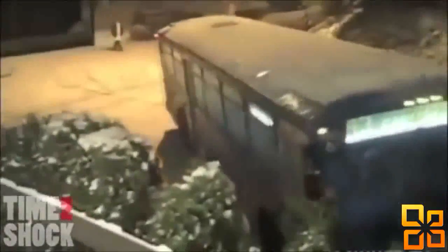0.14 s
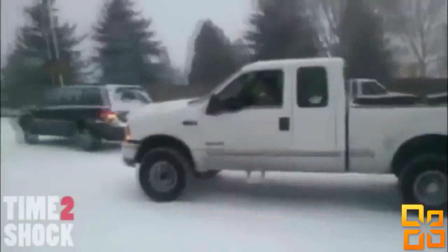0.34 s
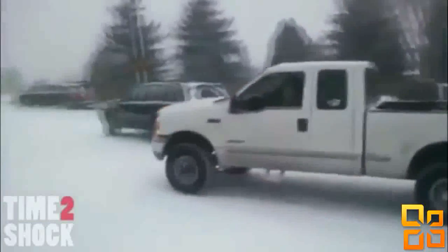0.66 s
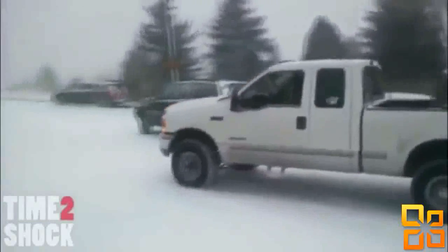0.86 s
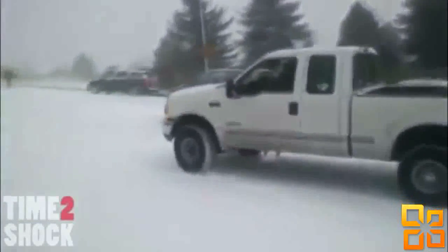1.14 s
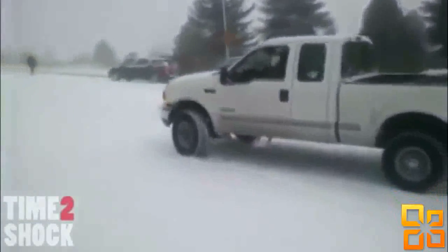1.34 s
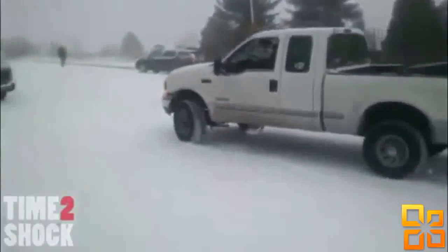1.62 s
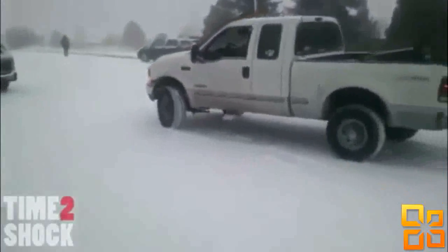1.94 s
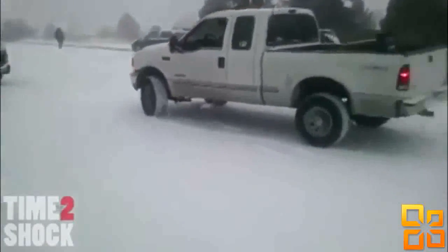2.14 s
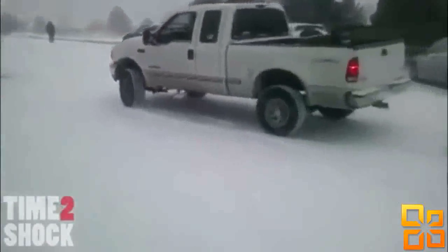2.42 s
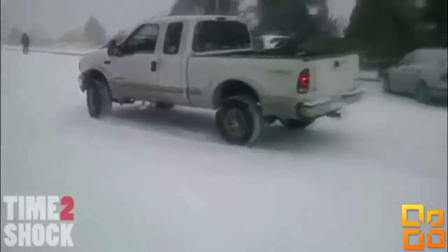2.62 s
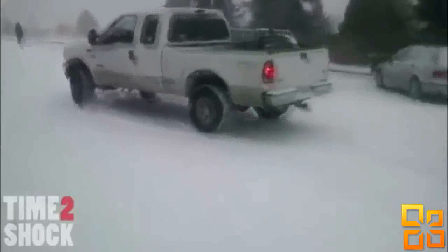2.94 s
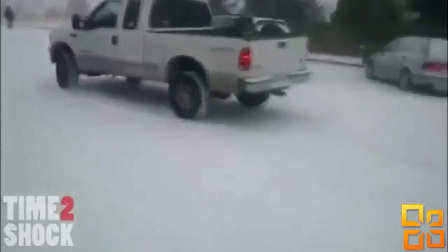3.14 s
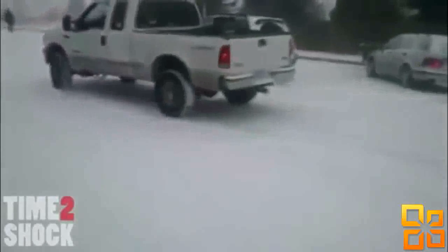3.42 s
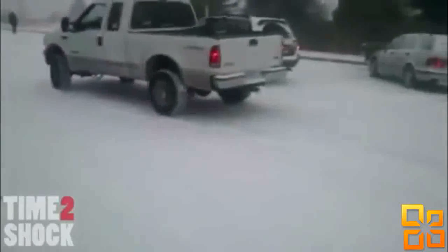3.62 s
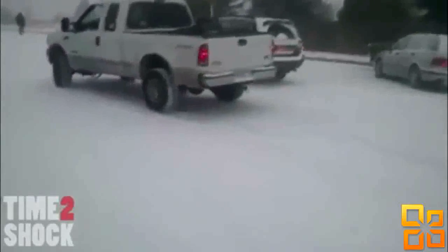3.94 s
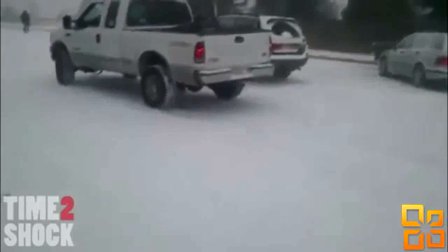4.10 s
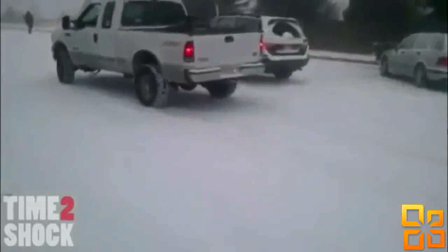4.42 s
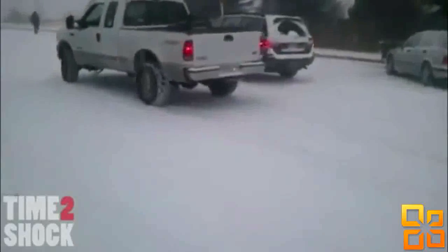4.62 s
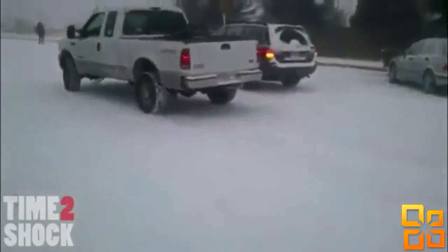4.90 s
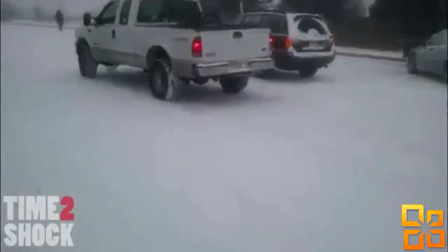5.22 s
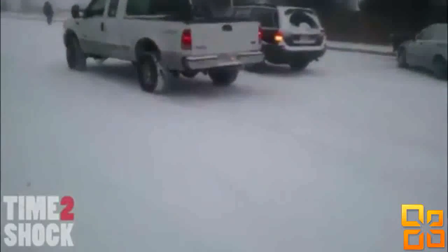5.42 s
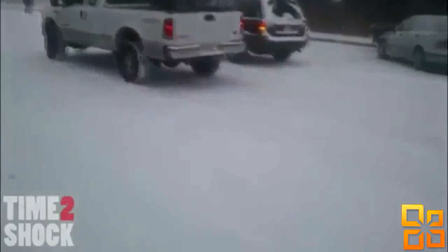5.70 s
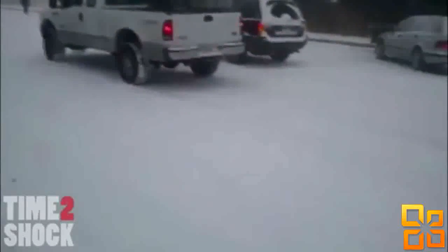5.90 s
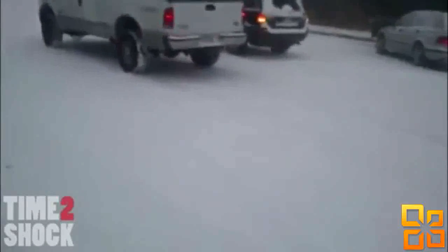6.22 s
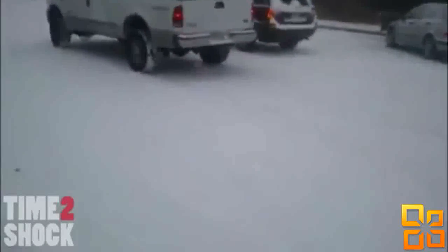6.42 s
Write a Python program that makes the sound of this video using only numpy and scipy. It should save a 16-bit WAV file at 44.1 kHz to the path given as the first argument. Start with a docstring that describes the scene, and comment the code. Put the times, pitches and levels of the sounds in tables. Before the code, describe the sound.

After brief silence, a rattling diesel truck breaks in abruptly, surging and easing as its wheels spin on snow amid gusty wind and traffic noise.

```python
"""After half a second of silence, clatter, hum and hissing tyres break in abruptly, in wind and street noise.
A diesel pickup creeps past on icy snow and pulls away, revving in bursts as its wheels slip.
Its V8 is noise pulsed at the firing rate through resonances, with an exhaust hum of sines.
Tyres are grainy filtered noise with cracks; thin noise bands glide; wind is random kicks, slaps and pops.
Street traffic is filtered noise with a wavering drone."""
import sys
import numpy as np
from scipy import signal
from scipy.fft import rfft, irfft, next_fast_len
from scipy.io import wavfile
from scipy.ndimage import uniform_filter1d, map_coordinates

SR = 44100
rng = np.random.default_rng(int(sys.argv[2]) if len(sys.argv) > 2 else 0)


def wrap_up_sound(samples):
    """Save the sound to the file named by the first command line argument, as 16-bit audio."""
    columns = np.atleast_2d(samples).T
    # keep every value between -1 and 1, then stretch to whole-number steps
    tamed = np.clip(columns, -1, 1)
    steps = np.round(tamed * 32767).astype(np.int16)
    wavfile.write(sys.argv[1], SR, steps)


N = 288855
T = np.arange(N) / SR  # time [s]


def amp(db):
    """Level: decibels to amplitude gain."""
    return 10 ** (np.asarray(db) / 20)


def unit(x):
    """Normalisation: scale to rms 1."""
    return x / np.sqrt(np.mean(x ** 2) + 1e-20)


def curves(rows):
    """Linear interpolation: one value per sample for each column after the time."""
    times, *columns = np.transpose(rows)
    return [np.interp(T, times, column) for column in columns]


def wobble(rate):
    """Band-limited random fluctuation: a smooth curve through rate random knots a second."""
    knots = rng.standard_normal(int(N * rate / SR) + 4)
    return map_coordinates(knots, [T * rate])


def filtered(x, response):
    """Linear filtering: the spectrum of x times a complex response of frequency."""
    size = next_fast_len(N + 8192)
    spectrum = rfft(x, size) * response(np.fft.rfftfreq(size, 1 / SR))
    return irfft(spectrum, size)[:N]


def coloured(x, points):
    """Spectral shaping: x through (frequency [Hz], level [dB]) points on a log axis."""
    f, db = np.transpose(points)
    return filtered(x, lambda hz: amp(np.interp(np.log(hz + 1), np.log(f + 1), db)))


def ringing(x, modes, order=1):
    """Modal resonance: parallel resonators excited by x; a higher order gives steeper skirts."""
    def response(f):
        total = 0
        for centre, width, db in modes:
            damping = 1j * f * width
            total = total + amp(db) * (damping / (centre * centre - f * f + damping)) ** order
        return total
    return filtered(x, response)


def drifting(x, shift_hz):
    """Single-sideband modulation: all frequencies of x move by the same changing amount."""
    analytic = signal.hilbert(x, next_fast_len(N))[:N]
    return np.real(analytic * np.exp(2j * np.pi * np.cumsum(shift_hz) / SR))


def patchy(x, patchy_db):
    """Random spectral gain: patches a few hundred Hz wide and about a tenth of a second long."""
    z = signal.stft(x, nperseg=512)[2]
    field = uniform_filter1d(rng.standard_normal(z.shape), size=4, axis=0)  # across frequency
    field = uniform_filter1d(field, size=20, axis=1)  # across time
    return signal.istft(z * amp(patchy_db * unit(field)), nperseg=512)[1][:N]


def reflected(x, echo_db, reach, drift, count=9):
    """Comb interference: echoes off ice, bodywork and parked cars wander in delay, and so in colour."""
    delays = rng.uniform(0.0984, 1, count) * reach  # [s]
    echoes = 0
    for delay in delays:
        arrival = T - delay - drift * wobble(0.97)
        echoes = echoes + map_coordinates(x, [arrival * SR], order=1)
    gain = amp(echo_db)
    return (x + gain * echoes / np.sqrt(count)) / np.sqrt(1 + gain ** 2)


# Spectrum of street traffic: (frequency [Hz], relative level [dB per Hz])
STREET_SPECTRUM = [(20, -36.5), (45, -7), (90, 2), (150, 1), (220, 0), (290, -8), (480, -3.5), (730, -13.5),
                   (1150, -7.5), (2100, -9), (2900, -16.5), (5000, -12), (6000, -30.5), (7800, -44)]
# A low drone that comes and goes: (time [s], frequency [Hz], mean level [dB])
DRONE_TRACK = [(.5, 131, -45), (3.55, 131, -44.5), (3.72, 135, -40.5), (3.9, 133, -49), (4.58, 122, -55),
               (4.67, 125, -41), (4.82, 134, -45), (4.92, 133, -52), (5.1, 130, -49), (6.05, 131, -46.5),
               (6.35, 128, -60), (6.46, 129, -41)]


def street():
    """Broadband and tonal background: uneven traffic noise and a drone, as of another car working nearby."""
    noise = coloured(rng.standard_normal(N), STREET_SPECTRUM)
    traffic = amp(-38 + wobble(2.74)) * unit(patchy(noise, patchy_db=2.0))
    drone_hz, drone_db = curves(DRONE_TRACK)
    phase = 2 * np.pi * np.cumsum(drone_hz + 1.5 * wobble(9)) / SR
    drone = amp(drone_db + 1.5 * wobble(12)) * unit(np.sin(phase))
    return reflected(traffic, echo_db=-5.0, reach=.02, drift=.0001) + drone


EDDIES_PER_S = 1100  # mean number of separate kicks


def eddies(spectrum):
    """Turbulence as shot noise: a rapid, irregular train of kicks on the diaphragm, levelled in strength."""
    kicks = (rng.random(N) < EDDIES_PER_S / SR) * rng.standard_normal(N)
    rush = unit(coloured(unit(kicks) + 0.32 * rng.standard_normal(N), spectrum))
    return rush / np.sqrt(abs(uniform_filter1d(rush ** 2, size=700)) + 1e-6)


# Single eddies that kick the diaphragm: (time [s], throw level before limiting [dB], nominal swing [Hz])
POP_KICKS = [(0.8874, -11, 377), (.916, -17.5, 183), (1.0698, -11.5, 699), (1.1144, -14, 380),
             (1.3645, -12.5, 550), (1.412, -13, 550), (1.4708, -13, 384), (1.5527, -10.5, 480),
             (1.5886, -12.5, 482), (1.7235, -13, 380), (2.071, -16, 650), (2.074, -6.5, 550),
             (2.0864, -17, 300), (2.115, -11, 600), (2.1609, -12, 330), (2.2816, -10.5, 680),
             (2.295, -17, 380), (2.3468, -9.5, 350), (2.5368, -10.5, 300), (2.8765, -16, 380),
             (3.032, -18.5, 180), (3.3453, -17, 161), (3.9082, -19, 480), (3.9686, -9, 620),
             (3.9855, -11, 280), (3.9901, -12, 710), (4.027, -17, 300)]
POP_FRONT = 1.29  # factor on the nominal swing rate
POP_RECOIL = 0.68  # speed and size of the swing back, relative to the throw


def pops():
    """Transient displacement: a kick throws the diaphragm out steeply; it swings back once, more slowly."""
    out = np.zeros(N)
    for s, db, hz in POP_KICKS:
        near = slice(round((s - .02) * SR), round((s + .02) * SR))
        age = T[near] - s
        pace = np.where(age < 0, 1, POP_RECOIL)
        swing = np.sqrt(2) * np.pi * hz * age * POP_FRONT * pace
        out[near] -= amp(db) * pace * swing * np.exp((1 - swing ** 2) / 2)
    return out


# Broad gusts: (peak time [s], level before flutter gain [dB], half-length to 1/e of power [s])
GUST_SWELLS = [(.9, -32, 0.21), (1.65, -27, 0.34), (2.28, -27.5, 0.55), (3.3, -36, 0.44),
               (4.03, -35.5, 0.24)]
# Slaps on the microphone: (peak time [s], level before common gain [dB], nominal length [s], brightness [0-1])
WIND_SLAPS = [(0.927, -25.5, 0.02, 0.03), (1.069, -24.5, .014, 0.3), (1.131, -27, 0.038, 0.15),
              (1.364, -23.5, 0.042, 0.53), (1.412, -18.5, 0.018, 0.88), (1.447, -15.5, 0.023, 1),
              (1.475, -15.5, 0.017, .75), (1.5, -23.5, 0.032, 1), (1.598, -24, 0.044, 0.95),
              (1.672, -23.5, 0.035, 0.58), (1.71, -25, 0.024, 0.28), (1.864, -27, .03, 0.07),
              (2.014, -31, 0.014, .3), (2.081, -20.5, 0.017, 0.72), (2.134, -22, .028, 0.3),
              (2.198, -21.5, 0.019, 0.65), (2.282, -19.5, 0.027, .3), (2.331, -22, 0.027, 0.23),
              (2.408, -22, 0.017, 0.85), (2.527, -22, 0.019, .25), (2.61, -26.5, 0.027, 0.14),
              (2.822, -26, 0.02, 0.7), (3.307, -24.5, .018, 0.27), (3.337, -26, 0.022, 0),
              (3.557, -25.5, 0.013, 0), (3.727, -28, .019, 0.08), (3.873, -22, 0.02, 0.27),
              (3.927, -29, .01, 0.47), (3.963, -26.5, 0.031, 0.7), (3.999, -24, 0.02, 0.4),
              (4.097, -23, 0.012, 0.16), (4.158, -28, .016, 0.7), (4.55, -33.5, 0.0081, 0)]
# Spectrum of flutter and dull slaps: (frequency [Hz], relative level [dB per Hz])
BUFFET_SPECTRUM = [(20, -41.5), (45, -14.5), (90, -7), (170, 0), (280, -4), (450, -10), (700, -24.5),
                   (1100, -26.5), (2000, -40.5), (8000, -73)]
# Spectrum of bright slaps: (frequency [Hz], relative level [dB per Hz])
BRIGHT_SLAP_SPECTRUM = [(25, -33), (60, -19), (130, -8), (280, 2), (480, 0.5), (720, -4.5), (1200, -21),
                        (2200, -29), (6000, -40), (10000, -81.5)]
CALM_DB, LUMPS_DB = -58, 2.5  # turbulence floor before flutter gain; slow unevenness of the flutter


def wind():
    """Turbulent pressure: gusts flutter unevenly, and eddies slap the microphone, some dull, some bright."""
    power = amp(2 * CALM_DB)
    for s, db, half in GUST_SWELLS:
        power = power + amp(2 * db) * np.exp(-((T - s) / half) ** 2)
    lumps = amp(-4 + LUMPS_DB * wobble(18) + 2.5 * wobble(60))
    flutter = np.sqrt(power) * lumps * eddies(BUFFET_SPECTRUM)
    dull, bright = np.zeros(N), np.zeros(N)  # powers
    for s, db, length, brightness in WIND_SLAPS:
        span = 2 * (T - s) / length * np.where(T < s, 1.15, .9)  # rises faster than it dies away
        slap = amp(2 * db) * np.exp(-np.minimum(span ** 2, 50))
        share = np.clip(brightness, 0, 1)
        dull += (1 - share) * slap
        bright += share * slap
    slaps = np.sqrt(dull) * eddies(BUFFET_SPECTRUM) + np.sqrt(bright) * eddies(BRIGHT_SLAP_SPECTRUM)
    return flutter + amp(0.5) * slaps + pops()


# Thin bands of noise that swell, glide and fade:
# (centre time [s], nominal length [s], frequency [Hz], glide [Hz/s], noise rate [knots/s], peak rms level [dB])
THIN_BANDS = [(2.3, 0.2, 1675, -1, 120, -41), (2.7, .11, 1614, -300, 181, -33.5),
              (3.0, .064, 4920, 2000.5, 130, -39), (3.111, .07, 1470, -600, 259.5, -29.5),
              (4.847, .35, 1665, 0, 201.7, -40)]


def thin_bands():
    """Narrow-band noise: random quadrature carriers swell, glide and fade."""
    out = np.zeros(N)
    for s, length, hz, glide, width, db in THIN_BANDS:
        age = np.clip(T - s, -2 * length, 2 * length)
        phase = 2 * np.pi * np.cumsum(hz + glide * age) / SR
        band = wobble(width) * np.sin(phase) + wobble(width) * np.cos(phase)
        out += amp(db) * np.exp(-2 * (age / length) ** 2) * unit(band)
    return out


# Spectrum of the snow hiss: (frequency [Hz], relative level [dB per Hz])
SNOW_SPECTRUM = [(1500, -19.5), (3500, 13.5), (5000, 6.5), (6500, 0.5), (7900, -23), (12000, -8.5)]
# Ice under the tyres: (onset time [s], envelope peak before colouring [dB])
ICE_CRACKS = [(1.414, -35), (1.471, -34), (1.75, -32.5), (1.91, -35), (1.919, -38), (3.654, -38.5),
              (3.753, -42), (4.1502, -34.5), (4.221, -43), (4.351, -37), (4.521, -41), (4.5945, -47),
              (4.675, -40), (4.722, -41)]
# hiss when rolling without slip, tail-on; rise at slip 1; rise when side-on
HISS_DB, HISS_SLIP_DB, HISS_FLANK_DB = -53, 14, 8


def tyres(slip, side):
    """Granular friction and brittle fracture: snow hisses in tiny grains, louder with slip; the crust cracks."""
    grains = amp(9.4 * np.tanh(wobble(900))) * rng.standard_normal(N)
    hiss_level = amp(HISS_DB + HISS_SLIP_DB * slip + HISS_FLANK_DB * side)
    hiss = hiss_level * unit(patchy(coloured(grains, SNOW_SPECTRUM), patchy_db=3.2))
    snaps = np.zeros(N)
    for s, db in ICE_CRACKS:
        snaps += amp(db) * (T >= s) * np.exp(-abs(T - s) / .0025)
    crust = coloured(snaps * rng.standard_normal(N), [(2000, -13), (5000, 8.5), (7500, 5.5), (12000, -9.5)])
    return reflected(hiss, echo_db=3.0, reach=.012, drift=.0001) + crust


# A narrow whine from the engine bay: (time [s], frequency [Hz], level before a 3 dB lift [dB])
WHINE_TRACK = [(.5, 1188, -45), (1.85, 1180, -40.5), (2.8, 1170, -57.5), (3.45, 1063, -43),
               (3.75, 1014, -55), (4.3, 1170, -45.5), (4.75, 1156, -53)]


def whine():
    """Random modulation of a carrier: a fuzzy, broken tone whose pitch and level follow the track."""
    hz, db = curves(WHINE_TRACK)
    phase = 2 * np.pi * np.cumsum(hz + 22 * wobble(20)) / SR
    fuzz = wobble(100) * np.sin(phase) + wobble(100) * np.cos(phase)
    return amp(db + 3.0) * unit(amp(0.63 * wobble(13)) * fuzz)


# Surges of engine load: (start of build [s], build time [s], time the decay starts [s], depth [0-1]);
# the last one fades from its start
LOAD_SURGES = [(-.1, 0.19, 1.35, 0.65), (1.921, 0.85, 3.086, 0.77), (3.55, 0.5, 4.12, 0.48),
               (4.55, 0.86, 5.64, 0.98), (6.28, 0.14, 5.9, 0.35)]


def load(release_s):
    """Exponential relaxation: each surge of engine load builds linearly and decays from its set time."""
    total = 0
    for start, build_s, decay_start, depth in LOAD_SURGES:
        build = np.clip((T - start) / build_s, 0, 1)
        total = total + depth * build * np.exp(-np.maximum(T - decay_start, 0) / release_s)
    return total


# The truck swings from side-on to tail-on: (start of turn [s], end of turn [s])
TURN_TIMES = [1.1, 3.6]


def side_on():
    """Directivity: 1 while the flank faces the microphone, 0 once the tail does."""
    return np.cos(np.interp(T, TURN_TIMES, [0, np.pi / 2])) ** 2


def exhaust(firings, hum_db):
    """Periodic pulsation: the silencer passes mostly the firing rate; unequal cylinders add 3/4 of it."""
    phase = 2 * np.pi * firings
    pipe = np.sin(phase) + amp(-16) * np.sin(2 * phase) + amp(-13) * np.sin(phase * 3 / 4)
    return amp(hum_db + 1.0 * wobble(22)) * unit(pipe)


def knocks(firings, decay, uneven_db, scatter_db, sustain):
    """Pulsed excitation: a noise burst fades after each firing; the eight cylinders differ in strength."""
    index, age = firings.astype(int), firings % 1  # age in firing periods
    cylinder_db = uneven_db * unit(rng.standard_normal(8))[index % 8]
    size_db = cylinder_db + scatter_db * rng.standard_normal(2048)[index]
    bursts = uniform_filter1d(amp(size_db) * np.exp(-age / decay), size=80)
    return (abs(sustain) + bursts) * rng.standard_normal(N)


# Clatter of the engine bay from the side: (frequency [Hz], relative level [dB per Hz])
FLANK_SPECTRUM = [(180, -46), (300, -10), (450, -7.5), (642, -5), (877, -9), (1170, -0.5), (1600, 1),
                  (1850, 1), (2020, -4.5), (2750, -3.5), (4420, -34.5), (5200, -17.5), (7710, -29.5),
                  (10000, -70.5), (17000, -120)]
# The same clatter from behind: (frequency [Hz], relative level [dB per Hz])
REAR_SPECTRUM = [(150, -33), (230, -7), (290, -10), (437, -2), (712, -10.5), (949, -1), (1210, -6.5),
                 (1400, 4.5), (1660, 5.5), (2670, -8), (3080, -14.5), (5160, -12.5), (5960, -30),
                 (7710, -68.5), (10000, -63), (17000, -120)]
# Ringing panels and covers: (frequency [Hz], width [Hz], relative level [dB])
COVER_MODES = [(334.7, 8.5, -7.5), (435, 33, -8), (615.3, 15.6, 0), (966, 30, -6), (1190, 26, -1),
               (1456, 34, -4), (1637, 68, -0.5), (2123, 98, -3.5), (2630, 57, -7), (3940, 57, -15)]
# Ringing of the engine bay from the side: (frequency [Hz], width [Hz], relative level [dB])
BAY_MODES = [(1350, 25, 4.5), (1810, 97, -1), (2300, 50, -6), (2720, 45, -10)]
# Injector rasp before its shift: (frequency [Hz], width [Hz], relative level [dB])
INJECTOR_MODES = [(4973, 510, 0)]
# Hard tapping when the engine races: (frequency [Hz], width [Hz], relative level [dB])
VALVE_MODES = [(2290, 1050, 0)]
NEAR_M, LEAVES_S, AWAY_M_PER_S = 4.57, 1, 0.99  # nearest distance, departure time, speed away
# block level unloaded and near, before its parts are mixed; rise at full load; extra knock while fuel flows
CLATTER_DB, CLATTER_LOAD_DB, CLATTER_FUEL_DB = -38, 12.5, 4.5
FUEL_CUT_S = 0.077  # decay time of the fuel after each surge
# injectors relative to the clatter; rise at full load, mostly near the top; change when side-on
RASP_DB, RASP_LOAD_DB, RASP_FLANK_DB = -15.5, 6.5, -3
RASP_CLIMB_HZ, RASP_WANDER_HZ = 199, 69.6  # rise when racing; size of the random shift


def engine(effort, speed_hz, hum_db, side):
    """Source-filter radiation: firing knocks ring block and covers, injectors rasp, and the exhaust hums."""
    firing_hz = speed_hz * (1 + 0.00627 * wobble(25))
    firings = np.cumsum(firing_hz) / SR
    blows = knocks(firings, decay=0.59, uneven_db=1.9, scatter_db=3.0, sustain=0.8)
    flank = unit(coloured(blows, FLANK_SPECTRUM))
    rear = unit(coloured(blows, REAR_SPECTRUM))
    block = side * amp(-1.0) * flank + (1 - side) * amp(-0.5) * rear

    shakes = knocks(firings, decay=0.59, uneven_db=2.0, scatter_db=1, sustain=0.65)
    covers = amp(-7.0) * drifting(unit(ringing(shakes, COVER_MODES)), 20 * wobble(8))
    bay = amp(-10.0) * side * unit(ringing(shakes, BAY_MODES))

    # when the engine races, the rasp climbs and the tapping comes in
    racing = np.clip((firing_hz - 90) / 30, 0, 1)
    ticks = knocks(firings, decay=0.93, uneven_db=4.0, scatter_db=3.5, sustain=0.97)
    rasp_shift_hz = RASP_CLIMB_HZ * racing + RASP_WANDER_HZ * wobble(14)
    injectors = drifting(unit(ringing(ticks, INJECTOR_MODES, order=2)), rasp_shift_hz)
    rasp = amp(RASP_DB + RASP_LOAD_DB * effort ** 2 + RASP_FLANK_DB * side) * injectors
    tapping = amp(-8.5) * racing * unit(ringing(ticks, VALVE_MODES, order=2))

    distance_m = NEAR_M + AWAY_M_PER_S * np.maximum(T - LEAVES_S, 0)
    level = amp(CLATTER_DB + CLATTER_LOAD_DB * effort + CLATTER_FUEL_DB * load(FUEL_CUT_S))
    clatter = level * NEAR_M / distance_m * (block + covers + bay + rasp + tapping)
    return reflected(clatter, echo_db=-5, reach=.022, drift=.00016, count=14) + exhaust(firings, hum_db)


# Engine speed and exhaust note: (time [s], mean firing rate [Hz], mean hum level [dB])
RUNNING_TRACK = [(.5, 92.2, -45), (1.3, 99.8, -42), (1.95, 70.2, -57), (2.6, 84.07, -50),
                 (2.92, 108.3, -38), (3.13, 117.4, -34), (3.22, 109.6, -47), (3.55, 69.76, -50),
                 (4.1, 88.5, -38.5), (4.55, 72.1, -60), (4.92, 83.84, -47.5), (5.23, 108.4, -37),
                 (5.38, 121, -37.5), (5.6, 133.6, -30.5), (5.71, 134.8, -35), (5.77, 127, -48),
                 (6.28, 76.96, -58), (6.55, 84, -59)]
IDLE_HZ, FULL_HZ = 47, 145  # firing rates that count as revs 0 and 1
UNLOAD_S = 0.48  # decay time of the load after each surge


def scene():
    """Superposition: truck, street and wind; load shapes the clatter and, times revs, the wheelspin."""
    effort, side = load(UNLOAD_S), side_on()
    speed_hz, hum_db = curves(RUNNING_TRACK)
    revs = (speed_hz - IDLE_HZ) / (FULL_HZ - IDLE_HZ)
    background = street() + wind() + thin_bands()
    wheels = tyres(effort * revs, side)
    truck = whine() + engine(effort, speed_hz, hum_db, side)
    return (background + wheels + truck)[None]


# Microphone response: (frequency [Hz], level [dB])
MIC_RESPONSE = [(20, -6.5), (55, 0), (7850, -0.5), (8150, -16), (12000, -25), (15500, -35)]
START_S, TOP_HZ = .508, 15700  # sound begins; nothing passes from this frequency up


def record(dry):
    """Saturation and band-limiting: sound starts abruptly, peaks are rounded, little is kept above 8 kHz."""
    x = dry[0] * np.clip((T - START_S) / 0.0053, 0, 1)
    x = x / (1 + (x / .33) ** 6) ** (1 / 6)  # soft limit at 0.33
    return filtered(coloured(x, MIC_RESPONSE), lambda hz: hz < TOP_HZ)[None]


dry = scene()
out = record(dry)
wrap_up_sound(out)
```